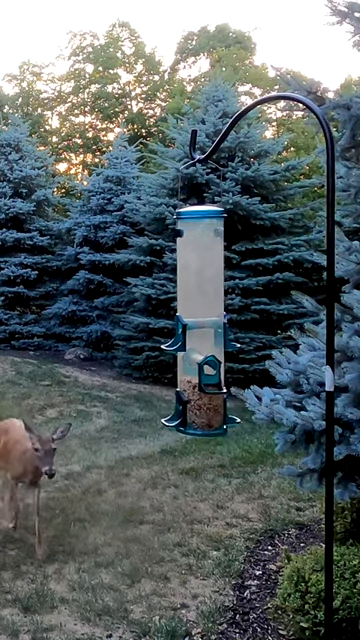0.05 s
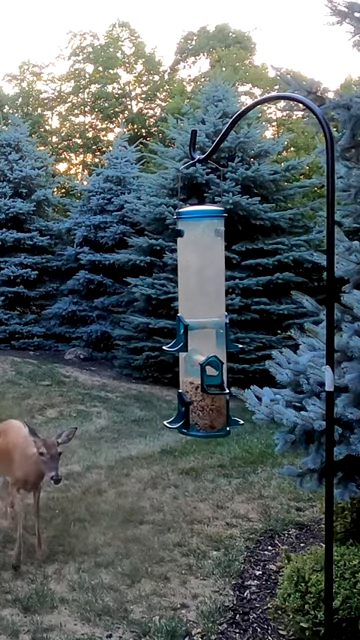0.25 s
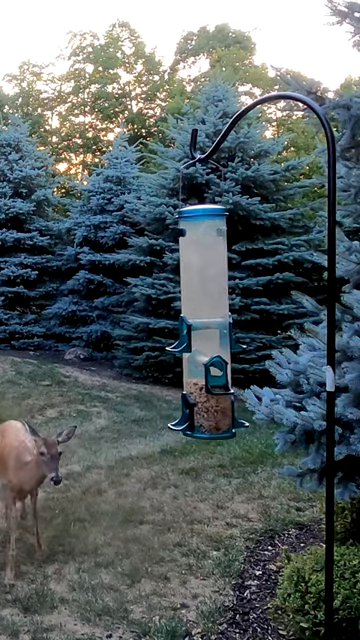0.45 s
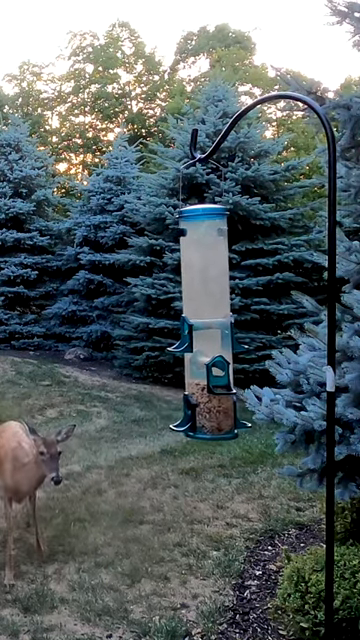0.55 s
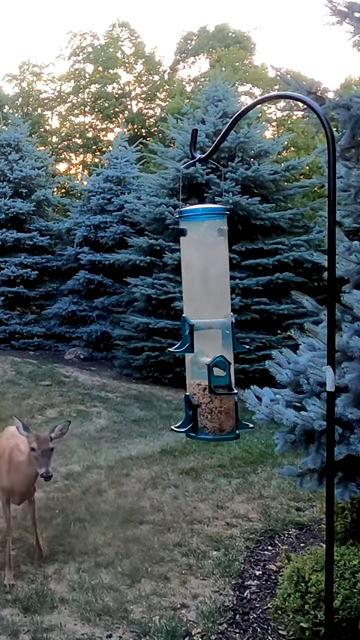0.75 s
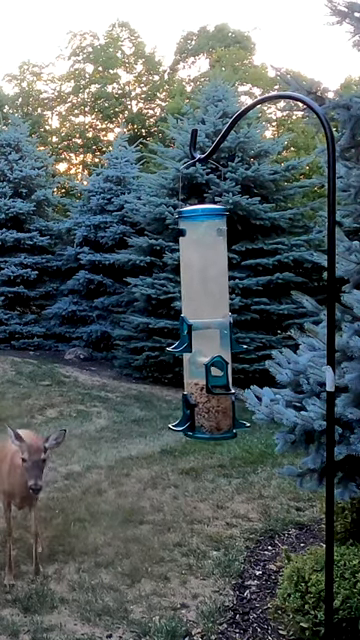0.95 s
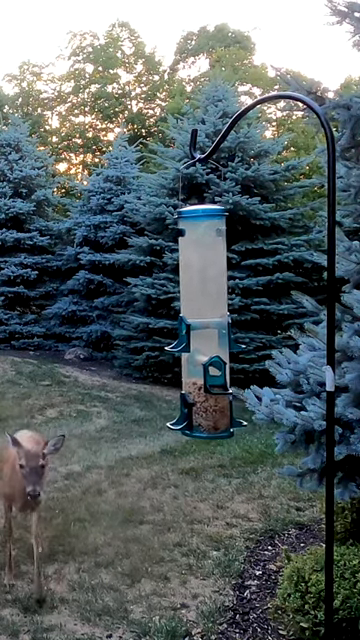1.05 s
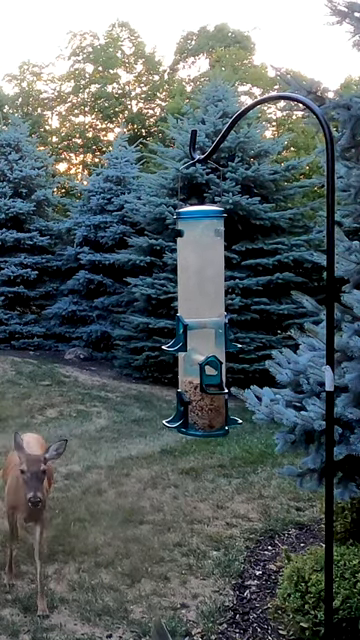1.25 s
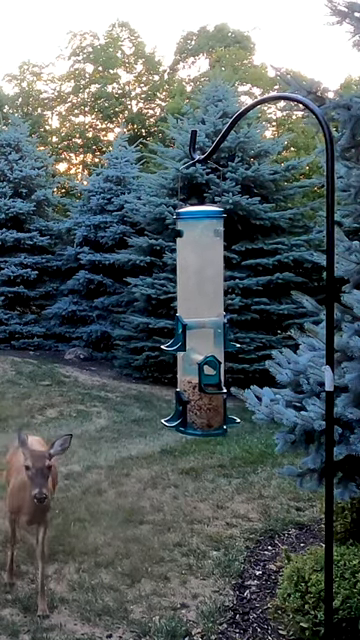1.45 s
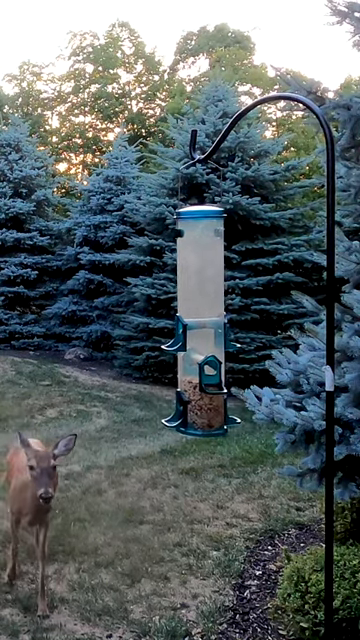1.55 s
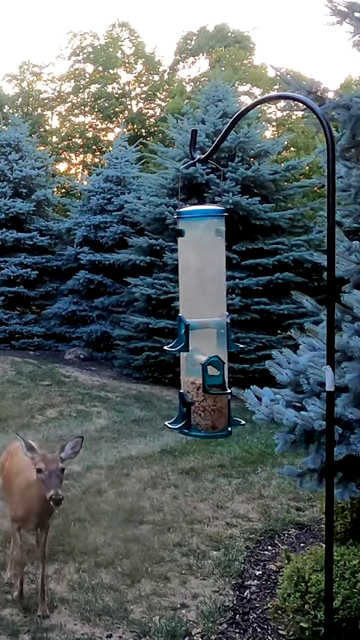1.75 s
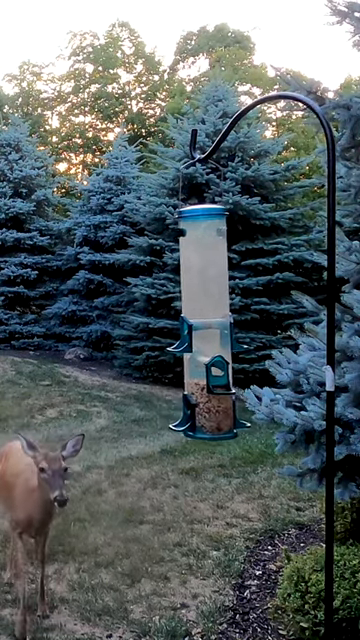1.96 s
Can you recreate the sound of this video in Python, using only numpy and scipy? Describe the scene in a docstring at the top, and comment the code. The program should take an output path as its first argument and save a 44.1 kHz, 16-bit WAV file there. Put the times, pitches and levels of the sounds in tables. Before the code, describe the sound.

Whistling, clapping wings of a dove flying off, over a faint insect in a garden.

```python
"""A garden, in stereo: from the start an insect chirps steadily on the left over faint hiss and low rumble.
After two faint ticks a bird, by its sound a dove, takes off close to the microphone. Its feathers
whistle, high on each downstroke and lower on the upstrokes. For the first second the wings also clap,
and their strokes push air at the microphone. Then the beats slow and fade as the bird flies off to the
left, with a little more echo off the ground and nearby surfaces."""
import sys
import numpy as np
from scipy import signal
from scipy.fft import rfft, irfft
from scipy.io import wavfile

SR = 44100
rng = np.random.default_rng(int(sys.argv[2]) if len(sys.argv) > 2 else 0)


def wav_record(signal):
    """Record a signal, one row per channel, as 16-bit PCM in the file named by sys.argv[1]."""
    frames = np.transpose(np.atleast_2d(signal))
    bounded = np.clip(frames, -1, 1)
    # unit amplitude maps onto the largest positive 16-bit level
    quanta = np.round(bounded * 32767).astype(np.int16)
    wavfile.write(sys.argv[1], SR, quanta)


N = 88200
T = np.arange(N) / SR
FLUTTER_HZ, FLUTTER_DB = 150, 0.5
ATTACK_S, RELEASE_S = 0.0029, 0.011

# Downstrokes, close by, crossing from right to left. Each row: start in seconds, length in seconds,
# pitch in Hz, opening overshoot in Hz, closing drop in Hz, level in dB, swell through the stroke in dB,
# early dip or bump in dB, octave in dB before colouring, left over right in dB.
DOWNSTROKES = [ (0.227, 0.03, 2200, 304, 460, -36, 0, -1.5, -6.5, -3.5),
               (0.297, 0.038, 2298, 484, 600, -40, 10.5, 2.5, -7, -4.5),
               (.373, 0.029, 2408, 143, 544, -33, 9, -8, -10.5, -2),
               (.447, 0.029, 2433, -14, 660, -33, 3, 0, -9, -2.5),
               (0.52, 0.038, 2396, 120, 500, -36.5, -5, -3, -8.5, -2.5),
               (0.6, 0.036, 2283, 142, 634, -35, -4, -5.5, -9, -3),
               (0.677, 0.039, 2223, 351, 470, -37, -5.5, -0.5, -8.5, -2.5),
               (.756, 0.046, 2358, 191, 151, -42.5, -15.5, -3, -6, -1.5),
               (.832, 0.03, 2520, 516, 404, -29.5, 5, -17, -10, -0.5),
               (0.915, 0.024, 2437, 100, 298, -31, 17, 4, -19, 0.5),
               (.989, 0.028, 2604, 192, 586, -30, 18, -7.5, -11.5, 1),
               (1.066, .030, 2356, 503, 340, -27.5, 9, -10.5, -5.5, 1),
               (1.141, 0.03, 2408, 465, 288, -28.5, 6.5, -8.5, -2.5, 3),
               (1.221, .031, 2342, 289, 150, -32.5, -3.5, -15.5, -3, 3.5),
               (1.302, 0.033, 2420, 9, 100, -33, 12, -1.5, -5, 4.5),
               (1.395, 0.031, 2309, 15, 154, -36.5, 14, 1, -1.5, 5.5),
               (1.496, 0.03, 2289, 0, 263, -39.5, 9, 2.5, 0, 6),
               (1.616, 0.039, 2280, -15, 100, -45, -4, 2.5, 1.5, 6.5),
               (1.729, 0.022, 2336, -8, 376, -39, 4.5, -1, -3.5, 4),
               (1.873, 0.028, 2152, 0, 50, -45.5, 9, -11, -0.5, 5)]
# Roughness of the whistle. Each row: time in seconds, noise as a share of the fundamental.
ROUGHNESS = [(.23, 0.14), (.7, 0.11), (.9, 0.16), (1.15, 0.39), (1.4, .12), (1.9, 0.07)]
# Harmonics 3 to 6, each in dB before colouring.
OVERTONES_DB = [-27.5, -23.5, -36.5, -38]
# How the overtones carry to the microphone. Each row: frequency in Hz, gain in dB.
OVERTONE_COLOUR = [(3800, -8.5), (4300, -14), (4750, -1.5), (5050, -1), (5500, 0.5), (6500, 12.5),
                   (8200, -2), (9500, 1.5), (11000, -9), (12200, -1.5), (15000, -15.5)]
def downstrokes():
    """Fluttering feathers: the pitch leaps up, sags through the stroke and drops as the wing stops."""
    rise_hz, rise_s, overshoot_s, sag_hz = 446, 0.003125, 0.00682, 100
    lead_s = np.array([[0], [0.00006]])   # the right channel is slightly ahead
    out, waver, shake = np.zeros((2, N)), drift(FLUTTER_HZ), drift(FLUTTER_HZ)
    for start, length, pitch, overshoot, drop, db, swell_db, dip_db, octave_db, pan_db in DOWNSTROKES:
        i, t = during(start, length)
        u = t / length
        hz = pitch - rise_hz * np.exp(-(t / rise_s) ** 2)
        hz += overshoot * (t / overshoot_s) ** 2 * np.exp(2 - 2 * t / overshoot_s) * (1 - u)
        hz -= sag_hz * (u - .5) + drop * u ** 6
        rough = np.interp(start, *np.transpose(ROUGHNESS))
        partials = wing_pair(hz * (1 + 0.022 * waver[i]), rough, count=6)
        lead = np.exp(2j * np.pi * pitch * lead_s)
        tone = partials[0] * lead
        for k, overtone_db in enumerate([octave_db - 0.5 * (u - .5)] + OVERTONES_DB, 2):
            gain = from_db(overtone_db + at_hz(OVERTONE_COLOUR, k * hz))
            tone += partials[k - 1] * lead ** k * gain * pan(-9 if k == 2 else 0)
        dip = np.exp(-((t - .008) / .0045) ** 2)
        shape_db = swell_db * (u - .5) + dip_db * dip + FLUTTER_DB * shake[i]
        envelope = gate(t, length, ATTACK_S, RELEASE_S) * from_db(db + shape_db)
        out[:, i] += np.sqrt(2) * tone.real * envelope * pan(pan_db)
    return out


# Upstrokes, right of centre. Each row: start in seconds, length in seconds, pitch in Hz, level in dB.
UPSTROKES = [(0.273, 0.023, 1302, -38.5), (0.349, 0.016, 1334, -39), (.416, 0.023, 1340, -38.5),
             (.490, 0.023, 1268, -38.5), (0.566, 0.018, 1235, -40.5), (0.648, 0.019, 1200, -38),
             (0.724, 0.026, 1219, -40), (0.803, 0.019, 1172, -45.5), (0.885, 0.024, 1143, -44.5),
             (0.967, 0.017, 1180, -46), (1.118, .018, 1145, -49.5), (1.193, 0.0173, 1206, -48),
             (1.273, 0.027, 1113, -49), (1.357, 0.034, 1110, -57.5), (1.541, 0.063, 1318, -56.5),
             (1.757, 0.014, 1246, -51.5), (1.877, 0.016, 1254, -57.5), (1.968, .014, 1400, -56.5)]
def upstrokes():
    """A lower whistle that falls and fades as the wings lift."""
    fall, fade_db, octave_db = 0.26, -7.5, -22
    out, waver, shake = np.zeros(N), drift(FLUTTER_HZ), drift(FLUTTER_HZ)
    for start, length, pitch, db in UPSTROKES:
        i, t = during(start, length)
        u = t / length - .5
        hz = pitch * (1 - fall * u + 0.046 * waver[i])
        fundamental, octave = wing_pair(hz, rough=0.23, count=2).real
        envelope = gate(t, length, attack_s=.0015, release_s=.007)
        envelope *= from_db(db + fade_db * u + FLUTTER_DB * shake[i])
        out[i] += (fundamental + from_db(octave_db) * octave) * envelope
    return out * pan(-4.5)


def wing_pair(hz, rough, count):
    """Partials of two wings whistling slightly apart, so that they beat; turbulence roughens each."""
    t = np.arange(len(hz)) / SR
    k = np.arange(1, count + 1)[:, None]
    phase = 2 * np.pi * np.cumsum(hz) / SR
    apart_hz = rng.normal(-135, 44.4)
    other_wing = from_db(-8.5) * np.exp(2j * np.pi * k * (apart_hz * t + rng.random()))
    lowpass = signal.butter(2, 149, fs=SR, output="sos")
    turbulence = rms_one(signal.sosfilt(lowpass, rng.standard_normal((2, count, SR // 10))))
    real, imag = turbulence[..., -len(t):]
    depth = rough * k
    modulation = (1 + other_wing + depth * (real + 1j * imag)) / np.sqrt(1 + 2 * depth ** 2)
    return np.exp(1j * k * phase) * modulation


# Wing claps near the microphone. Each row: start in seconds, slap in dB, thump in dB.
CLAPS = [(.292, -39, -30.5), (0.363, -35.5, -30.5), (0.437, -37.5, -32.5), (0.511, -40.5, -28.5),
         (0.591, -39, -28.5), (.671, -40, -32.5), (0.749, -45.5, -31.5), (.824, -48, -29.5),
         (0.958, -50, -32), (1.106, -40.5, -40)]
# Spectrum of a slap. Each row: frequency in Hz, relative level in dB.
CLAP_COLOUR = [(150, 5), (400, -7), (900, 0.5), (1600, 6.5), (2600, 3), (3600, -16), (5500, -0.5),
               (8000, -17.5), (11000, -27), (15000, -39)]
def wing_claps():
    """The wings slap together at the top of a beat."""
    return bursts(CLAPS, CLAP_COLOUR, decay_s=0.0029)


# Air reaching the microphone from a downstroke. Each row: time in seconds, pulse height in dB.
PUSH = [(.23, -38.5), (.5, -46.5), (.68, -36), (.77, -26), (.85, -25), (1.0, -24.5), (1.08, -26),
        (1.16, -30.5), (1.24, -37.5), (1.4, -38.5), (1.9, -67)]
def air_pulses():
    """Each downstroke sucks, then pushes; each clap thumps."""
    out = np.zeros(N)
    for start, *_ in DOWNSTROKES:
        suction = from_db(-1) * pulse(start + 0.017, width_s=0.0041)
        push = pulse(start + 0.0344, width_s=0.003)
        out += level(PUSH, start) * (push - suction)
    for start, _, thump_db in CLAPS:
        out -= from_db(thump_db) * pulse(start + 0.0013, width_s=0.0013)
    return signal.sosfilt(signal.butter(1, 10, "high", fs=SR, output="sos"), out)


# Feather snaps while the bird is near. Each row: start in seconds, level in dB.
SNAPS = [(.258, -41), (.303, -36.5), (.375, -36.5), (.448, -35), (.523, -35), (.549, -37.5), (.601, -33.5),
         (.681, -42), (.758, -39.5), (.922, -35), (1.009, -36), (1.068, -44), (1.144, -47.5),
         (1.224, -37.5)]
# Spectrum of a snap. Each row: frequency in Hz, relative level in dB.
SNAP_COLOUR = [(150, -10), (400, 2), (900, -8), (1600, 0.5), (2600, 8), (3600, -12), (5500, 2),
               (8000, -14.5), (11000, -29), (15000, -32)]
def feather_snaps():
    """Feathers snap as they load and unload."""
    return bursts(SNAPS, SNAP_COLOUR, decay_s=0.0023)


# Downstroke hiss and lasting rustle, fading with distance. Each row: time in seconds, level in dB.
STROKE_HISS = [(.23, -46), (.38, -44.5), (.6, -44.5), (.76, -46), (.84, -47), (.93, -42), (1.08, -43),
               (1.16, -44.5), (1.3, -49.5), (1.5, -55.5), (1.88, -64)]
RUSTLE = [(0, -100), (.2, -61.5), (.23, -49.5), (.4, -45), (.65, -50), (.82, -50.5), (.95, -42), (1.1, -48),
          (1.25, -51.5), (1.45, -59.5), (1.75, -59), (2, -77)]
# Their spectra. Each row: frequency in Hz, relative level in dB.
STROKE_HISS_COLOUR = [(100, 4.5), (200, 8.5), (350, -6), (600, -3.5), (1200, -3.5), (2000, 8.5),
                      (2700, 7.5), (3500, -9.5), (5500, 3), (7500, -7.5), (10000, -16), (12500, -35),
                      (15000, -42)]
RUSTLE_COLOUR = [(100, 16.5), (200, 3), (350, -1.5), (700, -10.5), (1200, 3), (2400, 3.5), (3500, -5.5),
                 (5500, -1.5), (7500, -21), (10000, -22.5), (15000, -57)]
def feather_rustle():
    """Air through the feathers: a bright hiss on each downstroke over a duller, lasting rustle."""
    strokes = sum(gate(T - start, length, ATTACK_S, RELEASE_S) for start, length, *_ in DOWNSTROKES)
    hiss = noise(STROKE_HISS_COLOUR) * level(STROKE_HISS) * strokes
    return hiss + noise(RUSTLE_COLOUR) * level(RUSTLE)


# Low turbulence at the microphone. Each row: time in seconds, level in dB.
DRAUGHT = [(0, -50.5), (.19, -51), (.25, -42), (.45, -44), (.65, -51), (.9, -40.5), (1.1, -42.5),
           (1.3, -46.5), (1.45, -56), (1.58, -44.5), (1.76, -46), (1.83, -54), (1.95, -55), (2, -44.5)]
# Its spectrum. Each row: frequency in Hz, relative level in dB.
DRAUGHT_COLOUR = [(20, 5.5), (40, -6.5), (80, -3), (130, -12.5), (220, -26), (400, -27), (1000, -57)]
def wake():
    """The bird's wake rumbles on the microphone."""
    return noise(DRAUGHT_COLOUR) * level(DRAUGHT)


def insect():
    """Thin, even chirps well to the left, each an arch in pitch with a dip in level after its top."""
    period_s, length_s = .06397, 0.021
    pitch_hz, arch_hz, fall_hz = 8063, 464, 117
    out, waver = np.zeros(N), drift(300)
    for start in np.arange(.0335, N / SR, period_s):
        i, t = during(start + rng.normal(0, 0.0002), length_s)
        u = 2 * t / length_s - 1
        hz = pitch_hz - arch_hz * u * u - fall_hz * u / 2 + 25 * waver[i]
        arch = np.sqrt(np.clip(1 - u * u, 0, 1))
        dip = 1 - .5 * np.exp(-((u - .25) / .17) ** 2)
        out[i] += np.sqrt(2) * arch * dip * np.sin(2 * np.pi * np.cumsum(hz) / SR)
    return out * from_db(-61.5) * pan(16.5)


# Ticks in the garden. Each row: start in seconds, level in dB.
TICKS = [(.085, -47), (.096, -49.5), (1.686, -45)]
# Spectrum of a tick. Each row: frequency in Hz, relative level in dB.
TICK_COLOUR = [(1000, -5.5), (4000, -9), (6300, 1), (9000, -13), (14000, -55)]
def ticks():
    """Faint dry ticks, two before the take-off and one near the end."""
    return bursts(TICKS, TICK_COLOUR, decay_s=.0009)


# Paths to the microphone off the ground and nearby surfaces.
# Each row: delay in seconds, left gain in dB, right gain in dB.
ECHOES = [(.0052, -15, -49), (0.0138, -13, -18), (0.0215, -21.5, -24.5)]
def reflections(x):
    """A few near echoes and a short scatter from the trees."""
    tail_t60_s, tail_db = 0.15, -14.5
    echoes = np.zeros((2, N))
    for delay, left_db, right_db in ECHOES:
        delayed = np.array([np.interp(T - delay, T, channel, left=0) for channel in x])
        echoes += from_db([[left_db], [right_db]]) * delayed
    t = T[:N // 4]
    scatter = rng.standard_normal((2, len(t))) * from_db(-60 * t / tail_t60_s) * np.clip(t / 0.0033, 0, 1)
    scatter /= np.sqrt(np.sum(scatter ** 2, axis=1, keepdims=True))
    return echoes + from_db(tail_db) * signal.fftconvolve(x, scatter, axes=1)[:, :N]


# Rumble and hiss all around the microphone. Each row: frequency in Hz, relative level in dB.
GARDEN_COLOUR = [(15, -53), (25, -35.5), (133, 3), (289, -0.5), (331, -16), (722, -12), (1300, -6.5),
                 (1660, -9.5), (2120, -15), (2420, -17.5), (4150, -12.5), (4870, -26.5), (7910, -31),
                 (8810, -25.5), (15500, -67)]
HISS_COLOUR = [(3000, -34), (4500, -5), (5800, 0.5), (7100, 3), (7700, -3), (10000, -45)]
def garden():
    """The garden's steady background: a low rumble and a faint high hiss."""
    return from_db(-60.5) * noise(GARDEN_COLOUR) + from_db(-61.5) * noise(HISS_COLOUR)


# Likeness of the microphone's two channels. Each row: frequency in Hz, correlation from 0 to 1.
LIKENESS = [(40, 1), (125, 0.95), (250, 0.87), (500, 0.7), (1200, 0.61), (2400, 0.037), (5000, 0),
            (12000, 0)]
def noise(colour):
    """Coloured stereo noise at unit rms, alike in the bass and unrelated in the treble."""
    hz = np.arange(N // 2 + 1) * SR / N
    mid, side = rfft(rng.standard_normal((2, N)))
    alike = at_hz(LIKENESS, hz)
    both = np.sqrt(1 + alike) * mid + np.sqrt(1 - alike) * side * np.array([[1], [-1]])
    return rms_one(irfft(both * from_db(at_hz(colour, hz)) * (hz > 20), N))


def bursts(rows, colour, decay_s):
    """Short dying bursts of noise."""
    envelope = np.zeros(N)
    for start, db, *_ in rows:
        i, t = during(start, 10 * decay_s)
        envelope[i] += from_db(db) * t / decay_s * np.exp(2 - 2 * t / decay_s)
    return envelope * noise(colour)


def pulse(at_s, width_s):
    """A smooth pulse of pressure."""
    return np.exp(-((T - at_s) / width_s) ** 2 / 2)


def drift(rate_hz):
    """A smooth random wander at unit rms."""
    pole = np.exp(-2 * np.pi * rate_hz / SR)
    return rms_one(signal.lfilter([1], [1, -2 * pole, pole * pole], rng.standard_normal(2 * N))[N:])


def gate(t, length, attack_s, release_s):
    """Attack, hold, release."""
    attack = np.sin(np.pi / 2 * np.clip(t / attack_s, 0, 1))
    return attack * np.sin(np.pi / 2 * np.clip((length - t) / release_s, 0, 1))


def during(start, length):
    """Sample indices of an event and the time since its start."""
    i = np.flatnonzero((T >= start) & (T < start + length))
    return i, T[i] - start


def level(rows, t=T):
    """Gain along a curve of seconds and dB."""
    return from_db(np.interp(t, *np.transpose(rows)))


def at_hz(points, hz):
    """Read a spectrum on a log-frequency axis."""
    freqs, values = np.transpose(points)
    return np.interp(np.log(hz + 1), np.log(freqs), values)


def pan(db):
    """Left and right gains; positive dB is to the left."""
    return from_db(np.array([[db], [-db]]) / 2)


def from_db(db):
    """Decibels to gain."""
    return 10 ** (np.asarray(db) / 20)


def rms_one(x):
    """Scale to unit rms."""
    return x / np.sqrt(np.mean(x ** 2) + 1e-20)


def scene():
    """The bird, more echoing as it leaves the microphone, over the insect and the garden."""
    wetter_db_per_s = 1.5
    feathers = wing_claps() + feather_snaps() + feather_rustle()
    bird = downstrokes() + upstrokes() + feathers * pan(-1.5)
    small_sounds = insect() + ticks()
    background = garden()
    echoes = reflections(bird * from_db(wetter_db_per_s * (T - 1)) + small_sounds / 2)
    return bird + small_sounds + echoes + air_pulses() + wake() + background


def record(dry):
    """A steep low-pass cuts the top, 70 dB down from 16.5 kHz."""
    return signal.sosfilt(signal.cheby2(12, 70, 16500, fs=SR, output="sos"), dry)


dry = scene()
out = record(dry)
wav_record(out)
```